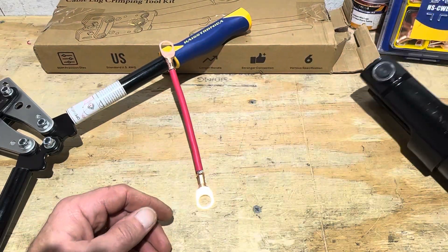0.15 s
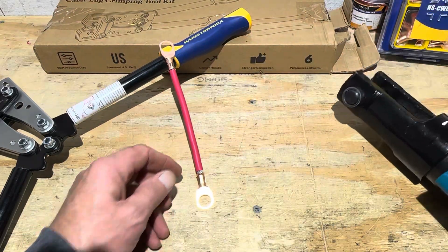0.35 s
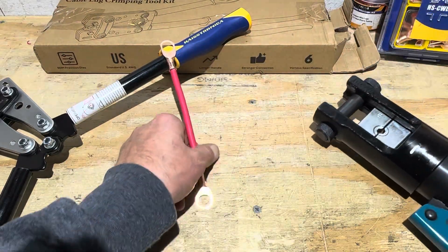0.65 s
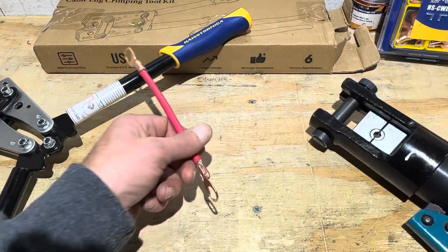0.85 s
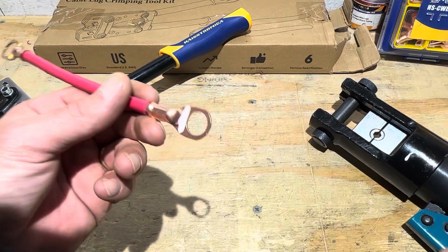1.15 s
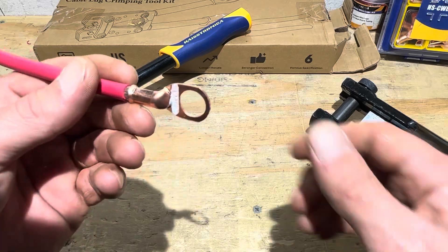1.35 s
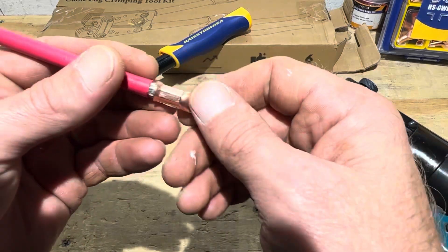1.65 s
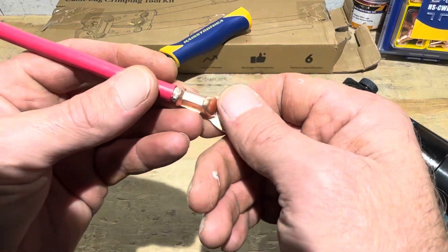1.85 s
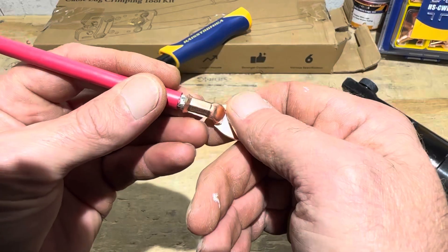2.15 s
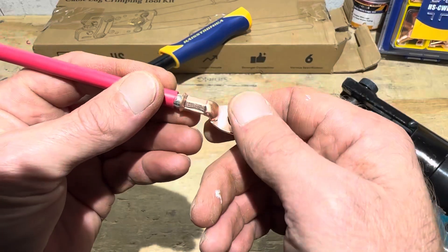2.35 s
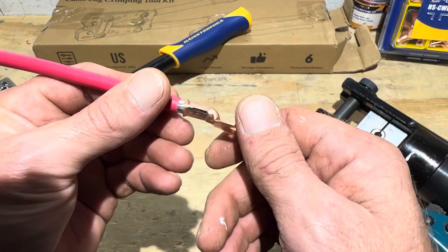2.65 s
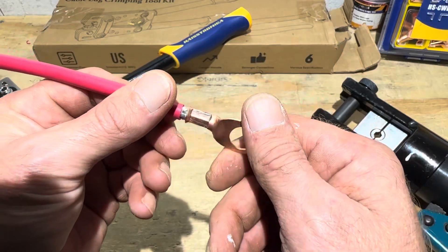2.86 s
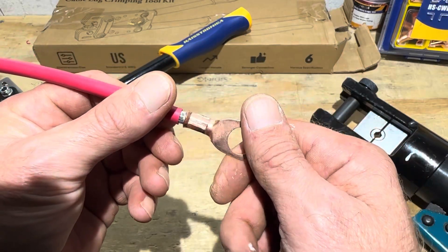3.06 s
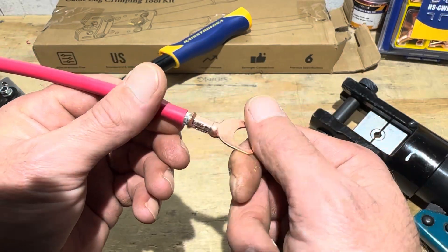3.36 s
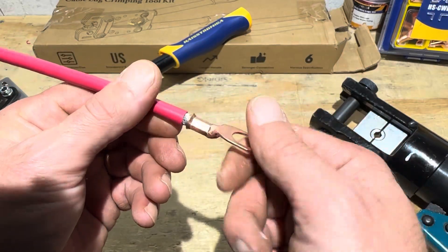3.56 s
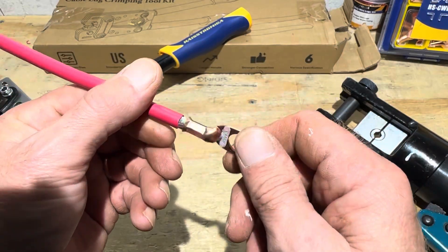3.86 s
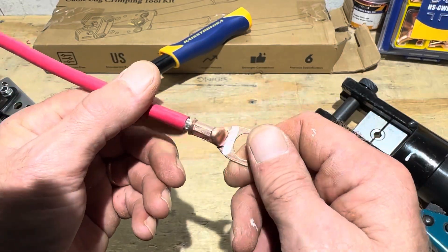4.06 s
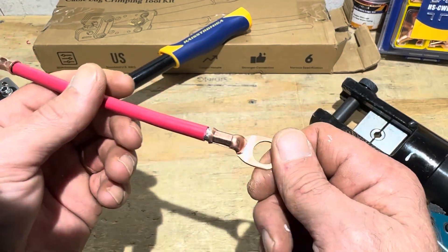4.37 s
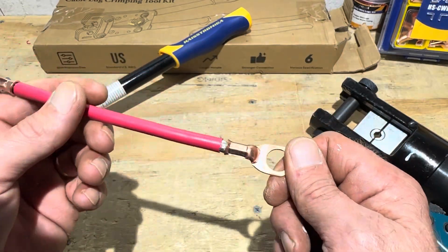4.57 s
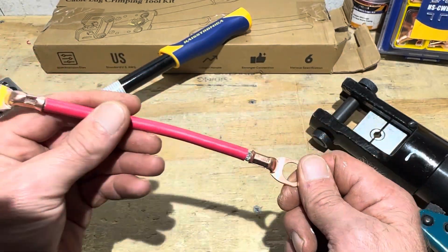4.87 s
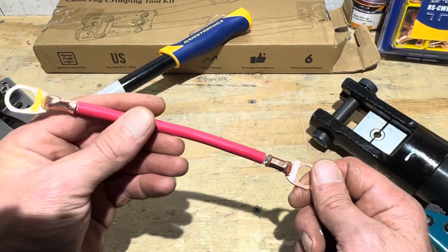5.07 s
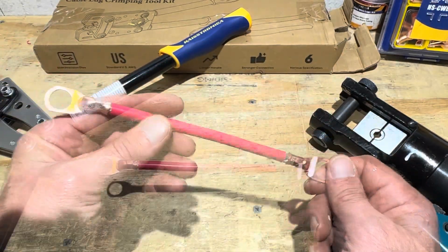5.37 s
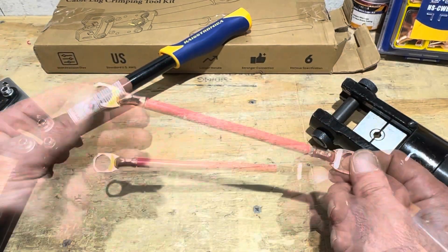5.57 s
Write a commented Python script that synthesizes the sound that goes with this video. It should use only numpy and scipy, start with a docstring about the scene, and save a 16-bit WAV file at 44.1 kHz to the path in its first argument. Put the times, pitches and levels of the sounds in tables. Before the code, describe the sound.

A heavy steel crimping tool is set down on a plywood workbench with a quick cluster of hollow thumps and sharp metal clacks. It rocks, scrapes briefly, knocks again and settles with small ticks within about a second. Then fingers turn a cable, with very faint rubbing, a tiny creak and thin squeaks. A faint electrical hum and quiet hiss continue in the workshop, heard close, with tool and hum slightly to the right.

```python
"""Workshop: a heavy hand-held crimper is set down on a plywood bench, rocks, slides and settles.
Its weight rings the modes of the bench top; its steel parts clack and tick. A cable is picked up and
turned in the fingers, with rubbing noise, a faint creak and thin squeaks; the bench trembles under the
arms. A thin electrical hum and whine stand to the right over quiet hiss."""
import sys
import numpy as np
from scipy import signal
from scipy.fft import rfft, irfft, next_fast_len
from scipy.io import wavfile

SR = 44100
rng = np.random.default_rng(int(sys.argv[2]) if len(sys.argv) > 2 else 0)


def int16_out(signal):
    """Quantize to a 16-bit WAV file."""
    q = np.round(np.clip(np.atleast_2d(signal).T, -1, 1) * 32767)
    wavfile.write(sys.argv[1], SR, q.astype(np.int16))


N = 252252


def bench_thumps():
    """Each landing pushes every bench mode for about a cycle; modes near the struck pitch ring most."""
    # start_s, strength_db, struck_hz
    landings = [(0.0005, -6.5, 76), (0.001, -19.5, 335), (0.010, -9, 69.4), (0.0328, -10.5, 350),
                (0.043, -16, 180), (0.057, -9.5, 74), (0.0564, -12, 324), (0.065, -2.5, 167.4),
                (0.066, -10.5, 283), (0.0837, -2, 76), (0.095, -9.5, 330), (0.0964, -18.5, 560),
                (0.1095, -9, 130.6), (0.1214, -20, 170), (0.16, -21.5, 75), (0.2158, -22.5, 183),
                (0.229, -26.5, 151), (0.2384, -22, 75.7), (0.2671, -21, 75), (0.3089, -28, 70),
                (0.6012, -8.5, 304), (0.6119, -10, 293.4), (0.6135, -27, 540), (0.6204, -14, 155),
                (0.622, -21.5, 70), (0.648, -27, 220), (0.6667, -26, 281), (0.6716, -27, 75.5),
                (0.7027, -32.5, 148), (0.714, -28, 105), (0.761, -30.5, 74.5), (0.7687, -41.5, 153),
                (0.8049, -39, 70.4), (0.8623, -23.5, 89.9), (0.874, -26, 69.3), (0.895, -37, 109.5),
                (0.9426, -41, 70), (0.975, -30, 69.8), (1.0302, -44.5, 70.1), (1.074, -46.5, 70)]
    # pitch_hz, level_db, t60_s, first_swing_sign, left_minus_right_db, left_lag_ms
    modes = [(55, -8.5, 0.11, 1, -2.5, 0.093), (76, 1.5, 0.16, -1, -1.5, 0.049),
             (105, -11.5, 0.097, 1, -2, 0), (149.6, 2.5, 0.14, 1, 0.5, 0.22),
             (170.3, -1.5, 0.088, 1, -3.5, 1), (203, 2.5, 0.057, -1, -5, .5), (230, 1.5, 0.088, -1, -5, .5),
             (313.5, 3, 0.12, 1, -4.5, .4), (352, -1, .07, -1, -4, 0.27), (423, 0.5, 0.088, 1, -2, 0.1),
             (557, -4.5, .1, -1, 2, 1), (587.6, -7, 0.082, -1, -1, 0.73), (675, -9.5, .08, -1, -2, 0.97),
             (823.4, -7.5, 0.15, 1, -1, 0.98)]
    rocking = [(0.3557 + k * 0.052, -27.5 - k * 2.5, 65.5) for k in range(4)]   # four soft bumps to rest
    below_db_per_octave, above_db_per_octave, above_max_db = 22, 20.5, 33.5
    start_s, strength_db, struck_hz = np.transpose(landings + rocking)
    out, length = np.zeros((2, N)), 2 * SR
    for hz, level_db, t60_s, sign, pan_db, lag_ms in modes:
        octaves = np.log2(hz / struck_hz)
        above_db = np.minimum(above_db_per_octave * octaves, above_max_db)
        fall_db = np.maximum(-below_db_per_octave * octaves, above_db)
        scatter_db = rng.normal(0, 0.83, (len(start_s), 2)).T
        clicks = np.zeros((2, length))
        clicks[:, (start_s * SR).astype(int)] = from_db(strength_db - fall_db + level_db + scatter_db)
        push = np.hanning(int(1.2 * SR / hz))
        force = signal.fftconvolve(clicks, [2 * push / push.sum()], "same")
        left, right = sign * ring(force, hz, t60_s)
        out[:, :length] += pan(pan_db) * [np.roll(left, int(lag_ms * SR / 1000)), right]
    return out


def steel_clacks():
    """Steel parts clack and tick: a sharp crack with a tail of micro-contacts rings the steel modes."""
    # start_s, level_db, tilt_db_per_octave, t60_s
    clacks = [(0.001, -25, 2, 0.056), (0.035, -25.5, -2, 0.19), (0.059, -28, 6, 0.16),
              (0.065, -13.5, 2.5, 0.058), (0.078, -21, -1.5, 0.17), (0.097, -35, -4, 0.13),
              (0.210, -45, -11, 0.17), (0.599, -31, -3, 0.18), (0.604, -27.5, -4, 0.062),
              (0.622, -38.5, -8, 0.19), (0.661, -42, -0.5, 0.18), (0.781, -50, -7, 0.075),
              (0.856, -52.5, -11, 0.096), (0.877, -66, 0, 0.09), (0.888, -66.5, 1.5, 0.13)]
    # small parts, narrower band: start_s, level_db, centre_hz, t60_s
    ticks = [(0.060, -21, 2800, 0.025), (0.098, -36.5, 5800, 0.14), (0.127, -42, 5700, .1),
             (0.159, -47.5, 6400, 0.1), (0.318, -62.5, 2320, 0.091), (0.379, -61, 3330, 0.085),
             (0.604, -37.5, 2670, 0.084), (0.661, -41, 2790, 0.069), (0.7568, -42.5, 3060, 0.11),
             (1.425, -70, 1914, .2), (1.543, -72, 1687, 0.081), (1.622, -76, 2300, .05),
             (1.918, -80.5, 1400, .04)]
    # pitch_hz, level_db, t60_s
    modes = [(1180, -7.5, 0.027), (1340, -6.5, 0.056), (1810, -15, .1), (2122, -8.5, 0.0664),
             (2225, -8.5, 0.22), (2730, -9, .09), (3052, -13, .1), (3765, -8, 0.094), (4246, -12.5, 0.087),
             (4411, -12, 0.29), (6250, -8, .12), (6640, -10, 0.16), (7800, -11.5, 0.12),
             (8730, -1.5, 0.082)]
    # sharp crack, heard with an empty band near 10-11 kHz: frequency_hz, density_db
    notched_spectrum = [(290, -29.5), (500, -0.5), (750, -9), (2040, -13.5), (3790, -19.5), (8300, -26),
                        (9600, -47.5), (11200, -53.5), (11800, -39.5), (13500, -39), (14300, -53),
                        (15600, -55.5)]
    ring_db, tick_focus_db_per_octave2 = -25.5, 7
    out, length, lead = np.zeros((2, N + SR)), 16384, 1024
    t = (np.arange(length) - lead) / SR
    fades = np.clip((t + .004) / .004, 0, 1) * np.clip((t[-1] - t) / .1, 0, 1)
    band_hz = np.geomspace(250, 16000, 60)
    hits = [(s, db, tilt * np.log2(band_hz), t60_s) for s, db, tilt, t60_s in clacks]
    hits += [(s, db, -tick_focus_db_per_octave2 * np.log2(band_hz / hz) ** 2, t60_s)
             for s, db, hz, t60_s in ticks]
    for start_s, level_db, colour_db, t60_s in hits:
        envelope = (t >= 0) * (from_db(-60 * t / t60_s) + 0.5 * from_db(-60 * t / 0.009))
        burst = rng.standard_normal((2, length)) * envelope
        contacts = burst * from_db(-60 * t / 0.015)
        for (hz, mode_db, mode_t60_s), scatter_db in zip(modes, rng.normal(0, 2.0, len(modes))):
            burst += from_db(ring_db + mode_db + scatter_db) * ring(contacts, hz, min(mode_t60_s, t60_s))
        spectrum = np.transpose([band_hz, at_hz(notched_spectrum, band_hz) + colour_db])
        hit = to_stereo(burst, spectrum, left_lag_ms=0.26, correlation=0.34)   # tool lies to the right
        at = int(start_s * SR)
        out[:, at:at + length] += from_db(level_db) * fades * hit
    return out[:, lead:lead + N]


def edge_snaps():
    """Hard steel edges tick: a few milliseconds of bright noise each."""
    # start_s, level_db
    snaps = [(0.604, -46), (0.663, -46.5), (0.666, -57), (0.756, -60)]
    t60_s = 0.016
    clicks = np.zeros(N)
    for start_s, level_db in snaps:
        clicks[int(start_s * SR)] = from_db(level_db)
    envelope = signal.lfilter([1], [1, -from_db(-60 / (t60_s * SR))], clicks)
    highpass = signal.butter(2, 7000, "high", fs=SR, output="sos")
    return signal.sosfilt(highpass, envelope * rng.standard_normal((2, N)))


def tool_slide():
    """The tool drags over the wood in short gritty strokes."""
    # start_s, hold_s, level_db
    drags = [(0.215, 0.12, -59), (0.40, 0.17, -60.5), (0.575, .015, -55), (0.79, 0.0075, -63.5),
             (0.86, 0.049, -74)]
    # frequency_hz, density_db
    grit_spectrum = [(210, -33), (350, -2), (481, -13.5), (1000, -9.5), (1090, -13.5), (1180, -9.5),
                     (1970, -17.5), (8390, -23), (9500, -33.5), (12400, -68), (20900, -120)]
    level_db = strokes_db(drags, rise_db_per_s=300.5, fall_db_per_s=301)
    return friction(level_db, grit_spectrum, flicker_db=-0.5, flicker_hz=47)


def finger_rub():
    """Fingers and sleeve rub on cable and bench."""
    # start_s, hold_s, level_db
    touches = [(0.31, 0.014, -65.5), (0.50, .05, -71), (0.93, 0.13, -87.5), (1.28, 0.044, -82.5),
               (1.42, 0.06, -85), (1.58, .08, -83.5), (1.79, 0.048, -85.5), (1.88, .02, -78.5),
               (2.18, 0.011, -86), (2.61, 0.029, -92.5), (3.40, 0.051, -87), (3.56, 0.14, -88),
               (3.89, 0.0098, -91), (4.17, .17, -84.5), (4.50, .03, -87), (4.88, 0.093, -92.5),
               (5.43, .11, -87)]
    # rubbing noise, heard with an empty band near 10-11 kHz: frequency_hz, density_db
    notched_spectrum = [(3000, -21), (5800, -12), (7200, -2), (9000, -3), (9800, -24.5), (11500, -24),
                        (12000, -6), (13600, -5.5), (14500, -18.5), (15500, -25.5)]
    level_db = strokes_db(touches, rise_db_per_s=149.5, fall_db_per_s=201, rest_db=-98)
    return friction(level_db, notched_spectrum, flicker_db=1.5, flicker_hz=50)


def creak():
    """Uneven little slips ring one short resonance."""
    # time_s, level_db
    swell = [(1.36, -110), (1.40, -79.5), (1.50, -79), (1.58, -81), (1.67, -83), (1.72, -110)]
    slips_per_s = 400
    slips = rng.standard_normal((2, N)) * (rng.random(N) < slips_per_s / SR)
    return from_db(in_time(swell)) * unit_rms(ring(slips, hz=2018, t60_s=0.01))


def squeaks():
    """Short, thin, unsteady gliding tones."""
    # start_s, hold_s, from_hz, to_hz, level_db
    glides = [(1.33, .05, 6420, 6450, -85.5), (1.42, 0.063, 7380, 6950, -86),
              (1.529, .03, 6270, 6250, -91.5), (1.61, .035, 6280, 6240, -93)]
    t, out = np.arange(N) / SR, 0
    for start_s, hold_s, from_hz, to_hz, db in glides:
        pitch_hz = np.interp(t, [start_s, start_s + hold_s], [from_hz, to_hz]) * (1 + 0.0046 * drift(36))
        level_db = strokes_db([(start_s, hold_s, db)], rise_db_per_s=500, fall_db_per_s=500)
        out += from_db(level_db + 2.0 * drift(30)) * np.sin(2 * np.pi * np.cumsum(pitch_hz) / SR)
    return out


def bench_tremble():
    """The bench trembles under the arms: a low rumble."""
    # time_s, level_db
    swell = [(0.5, -61), (0.9, -56.5), (1.12, -70.5), (1.5, -73), (2.3, -77), (2.5, -72), (2.75, -75),
             (2.95, -81.5), (5.72, -83)]
    # frequency_hz, density_db
    spectrum = [(15, -26), (25, -20), (59, -2), (150, -12.5), (214, -10), (250, -5), (320, -22),
                (550, -120)]
    return friction(in_time(swell), spectrum, flicker_db=2.0, flicker_hz=8.7)


def mains_hum():
    """Mains overtones, steady in pitch, wavering a little in level and fading at the end."""
    # time_s, level_db
    fade = [(1.0, -58.5), (5.11, -59), (5.36, -62.5), (5.56, -68.5), (5.72, -68.5)]
    # pitch_hz, level_db, left_minus_right_db, left_lead_rad
    partials = [(298.6, 1.5, -12.5, 1.7), (355.2, -21.5, -7.5, 0.33), (420, -26, -7.5, 1.7),
                (597.9, -38, -0.5, 2.7)]
    t, out = np.arange(N) / SR, np.zeros((2, N))
    for hz, level_db, pan_db, lead_rad in partials:
        phase = 2 * np.pi * hz * t + 0.15 * drift(8) + np.array([[lead_rad], [0]])
        out += from_db(in_time(fade) + level_db + .7 * drift(2.2)) * pan(pan_db) * np.sin(phase)
    return out


def whine():
    """A thin wavering tone slowly weakens while its octave swells and fades."""
    # time_s, level_db
    octave_swell = [(0.9, -104), (1.8, -89), (2.7, -99), (3.9, -90), (4.8, -93), (5.72, -92.5)]
    pitch_hz, start_db, sag_db_per_s = 5160, -93, 1.32
    t = np.arange(N) / SR
    phase = 2 * np.pi * pitch_hz * t + .25 * drift(5) + np.array([[.8], [0]])
    tone = from_db(start_db - sag_db_per_s * t + 1.5 * drift(10)) * pan(-3.5) * np.sin(phase)
    octave = from_db(in_time(octave_swell) + 1.3 * drift(10)) * np.sin(2 * phase)
    return tone + octave


def hiss():
    """Quiet hiss, heard with an empty band near 10-11 kHz."""
    # frequency_hz, density_db
    notched_spectrum = [(30, -27), (70, -5.5), (220, -0.5), (450, -6.5), (800, -16), (1500, -14.5),
                        (3000, -21), (8800, -24.5), (9700, -42.5), (11500, -42.5), (12200, -33.5),
                        (13800, -34), (15500, -46.5)]
    return from_db(-78.5) * stereo_noise(notched_spectrum)


def friction(level_db, spectrum, flicker_db, flicker_hz):
    """Rubbing noise whose level flickers."""
    return from_db(level_db + flicker_db * drift(flicker_hz)) * stereo_noise(spectrum)


def strokes_db(rows, rise_db_per_s, fall_db_per_s, rest_db=-200):
    """Level of strokes that swell, hold and fade above a resting level."""
    t, power = np.arange(N) / SR, from_db(2 * rest_db)
    for start_s, hold_s, level_db in rows:
        before_db = rise_db_per_s * np.maximum(start_s - t, 0)
        after_db = fall_db_per_s * np.maximum(t - start_s - hold_s, 0)
        power = power + from_db(2 * (level_db - before_db - after_db))
    return 10 * np.log10(power)


def ring(clicks, hz, t60_s):
    """One mode: a unit click starts a decaying sine of height 1."""
    r, w = from_db(-60 / (t60_s * SR)), 2 * np.pi * hz / SR
    return signal.lfilter([0, np.sin(w)], [1, -2 * r * np.cos(w), r * r], clicks + 1e-18)


def stereo_noise(spectrum):
    return to_stereo(rng.standard_normal((2, next_fast_len(N))), spectrum)[:, :N]


def to_stereo(noise, spectrum, left_lag_ms=0, correlation=None):
    """Colours mid and side noise by a normalised spectrum and mixes them to left and right."""
    # frequency_hz, left_right_correlation
    room_correlation = [(60, 0.7), (180, -0.12), (550, -0.1), (1650, -0.2), (4970, -0.1), (15000, -0.63)]
    # frequency_hz, left_minus_right_db
    balance = [(60, -1), (700, -1.5), (4400, -4.5), (8100, -0.5)]
    size = noise.shape[1]
    hz = np.maximum(np.fft.rfftfreq(size, 1 / SR), 1)
    colour = from_db(at_hz(spectrum, hz))
    mid, side = rfft(noise) * colour
    if correlation is None:
        correlation = at_hz(room_correlation, hz)
    channels = np.sqrt(1 + correlation) * mid + np.sqrt(1 - correlation) * side * [[1], [-1]]
    channels[0] *= np.exp(-2j * np.pi * hz * left_lag_ms / 1000)
    channels *= from_db(at_hz(balance, hz) * [[.5], [-.5]])
    return irfft(channels, size) / np.sqrt(np.mean(colour ** 2))


def drift(rate_hz):
    """Slow random wander, rms 1."""
    step = 40
    r = np.exp(-2 * np.pi * rate_hz * step / SR)
    slow = signal.lfilter([1], [1, -2 * r, r * r], rng.standard_normal(N // step + 2002))[2000:]
    return np.interp(np.arange(N) / step, np.arange(len(slow)), unit_rms(slow))


def from_db(db):
    return 10 ** (np.asarray(db) / 20)


def unit_rms(x):
    return x / np.sqrt(np.mean(x ** 2) + 1e-20)


def in_time(points):
    time_s, values = np.transpose(points)
    return np.interp(np.arange(N) / SR, time_s, values)


def at_hz(points, hz):
    points_hz, values = np.transpose(points)
    return np.interp(np.log(hz), np.log(points_hz), values)


def pan(left_minus_right_db):
    return from_db([[left_minus_right_db / 2], [-left_minus_right_db / 2]])


def scene():
    noises = tool_slide() + bench_tremble() + finger_rub() + hiss()
    impacts = bench_thumps() + steel_clacks() + edge_snaps()
    return impacts + noises + creak() + squeaks() + mains_hum() + whine()


def record(dry):
    """The microphone drops the deepest bass, rounds the loudest peaks and cuts the top."""
    thin = signal.sosfilt(signal.butter(3, 52, "high", fs=SR, output="sos"), dry)
    rounded = 1.019 * np.tanh(thin / 1.148)
    return signal.sosfilt(signal.cheby2(12, 70, 15700, fs=SR, output="sos"), rounded)


dry = scene()
out = record(dry)
int16_out(out)
```